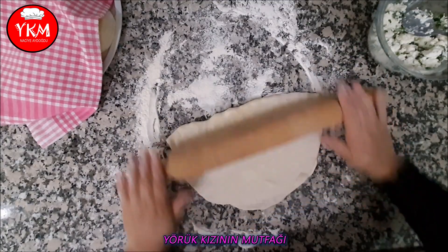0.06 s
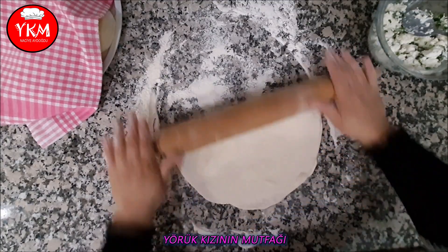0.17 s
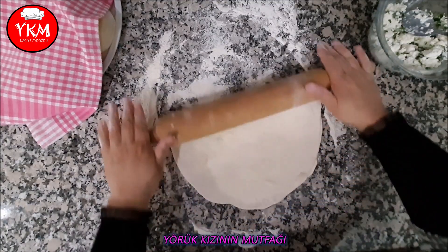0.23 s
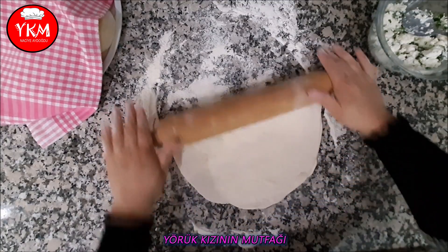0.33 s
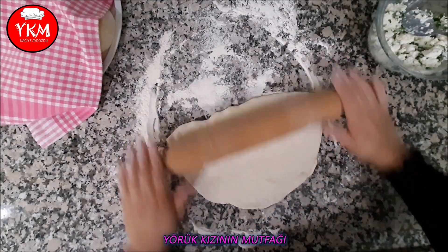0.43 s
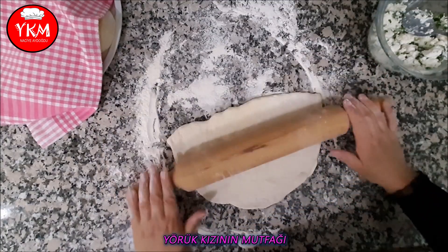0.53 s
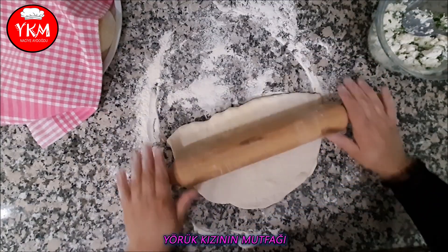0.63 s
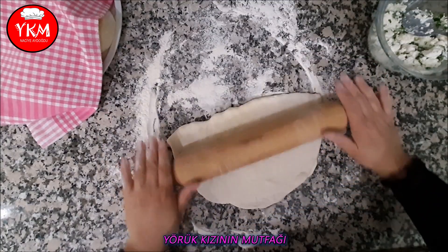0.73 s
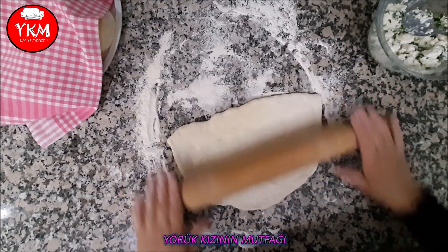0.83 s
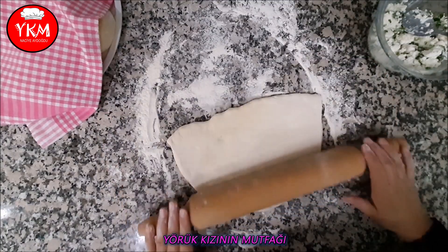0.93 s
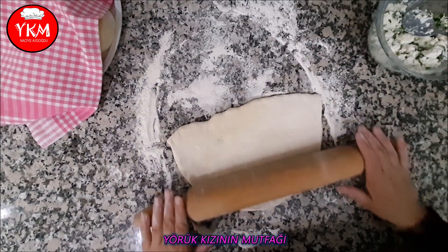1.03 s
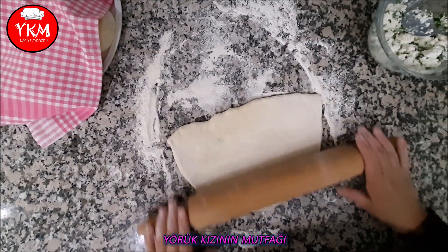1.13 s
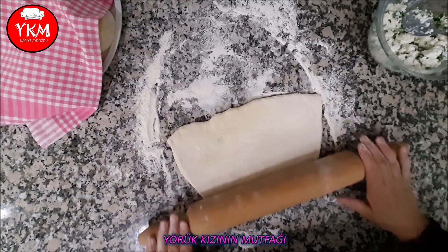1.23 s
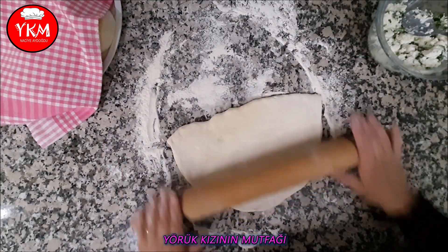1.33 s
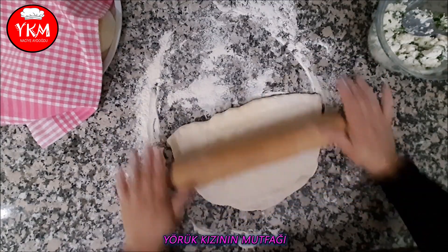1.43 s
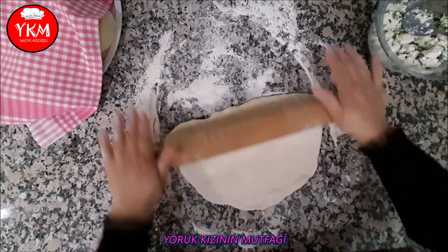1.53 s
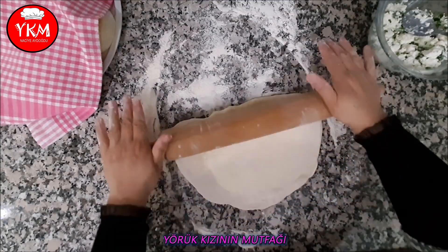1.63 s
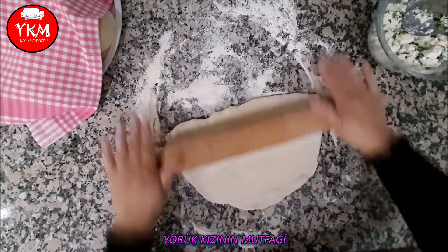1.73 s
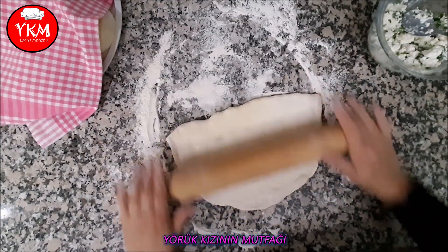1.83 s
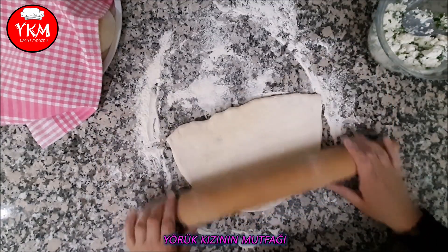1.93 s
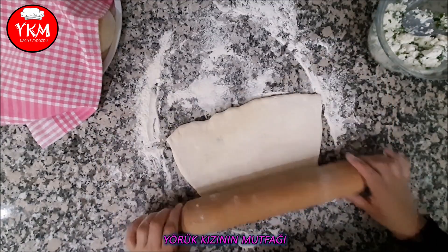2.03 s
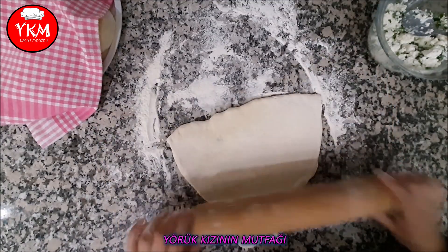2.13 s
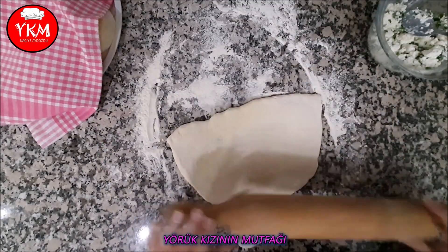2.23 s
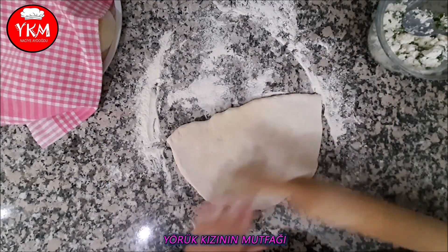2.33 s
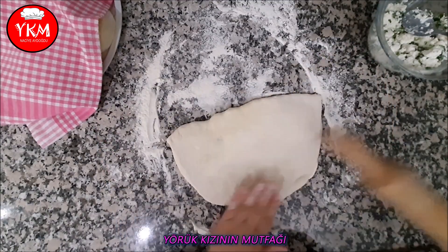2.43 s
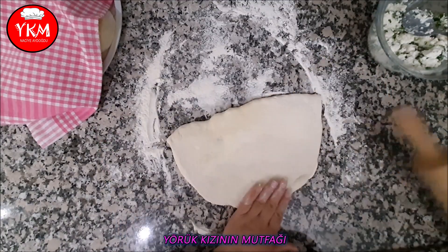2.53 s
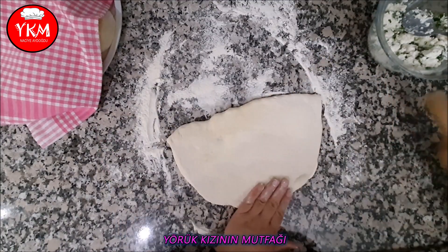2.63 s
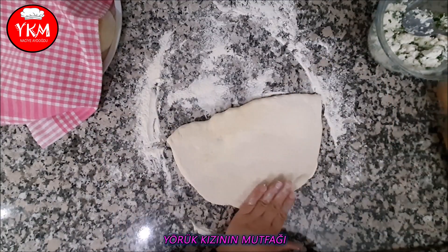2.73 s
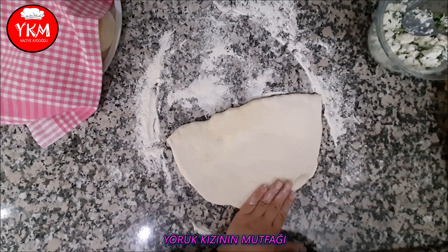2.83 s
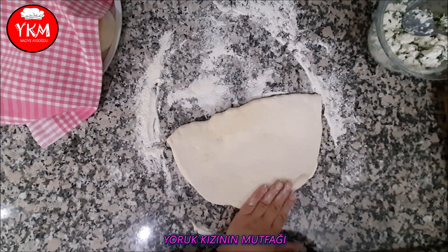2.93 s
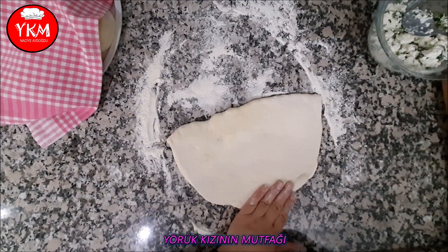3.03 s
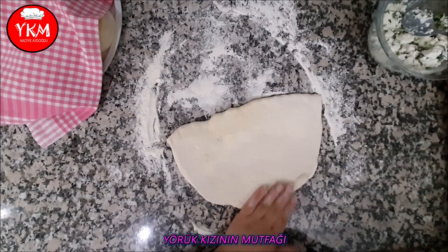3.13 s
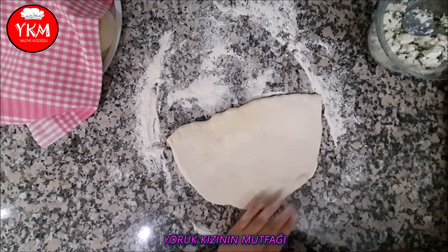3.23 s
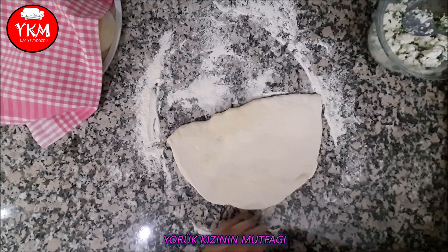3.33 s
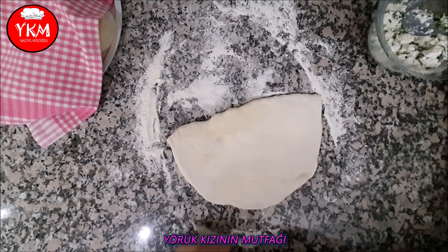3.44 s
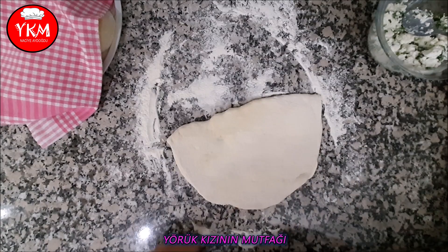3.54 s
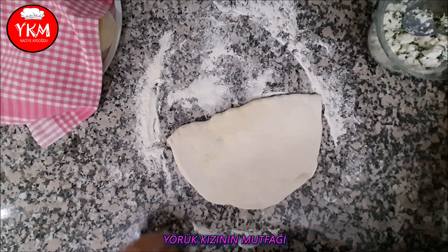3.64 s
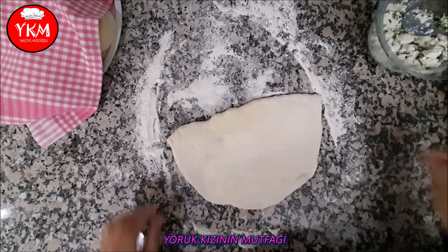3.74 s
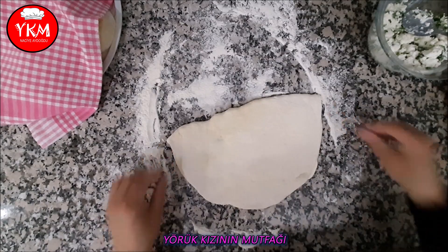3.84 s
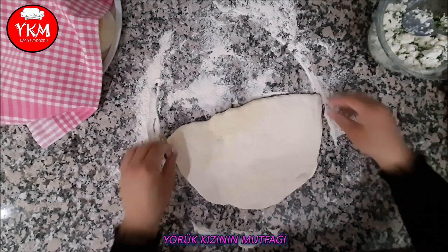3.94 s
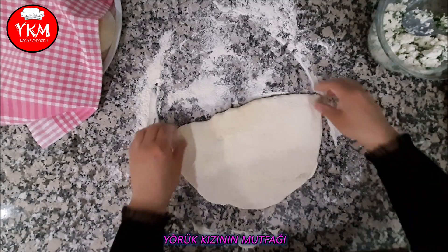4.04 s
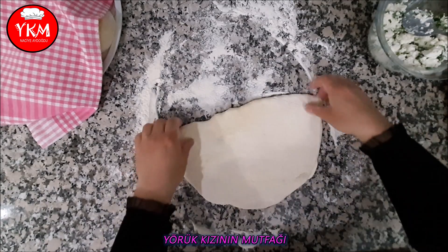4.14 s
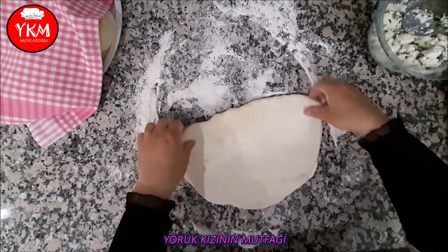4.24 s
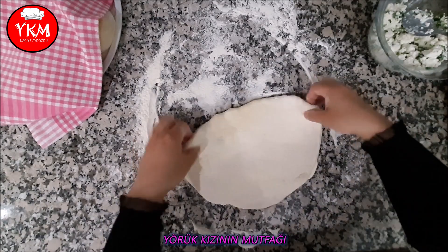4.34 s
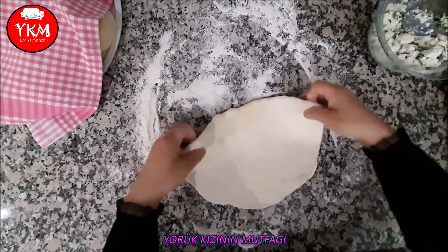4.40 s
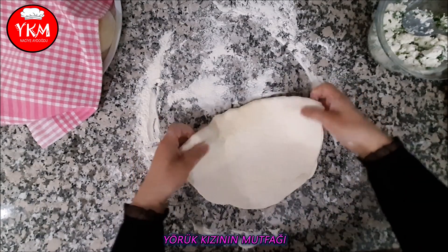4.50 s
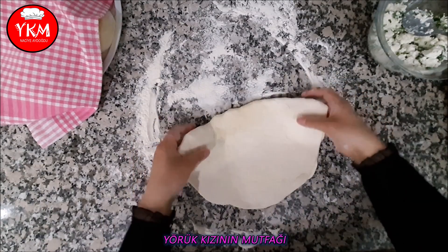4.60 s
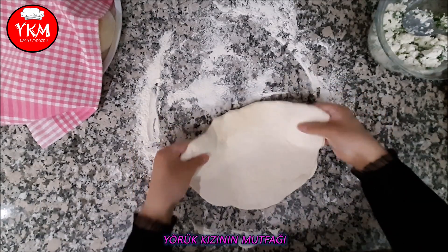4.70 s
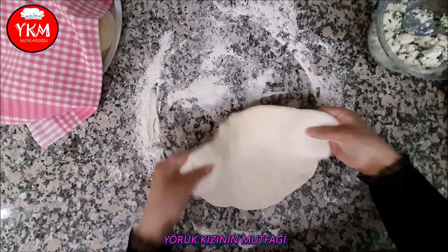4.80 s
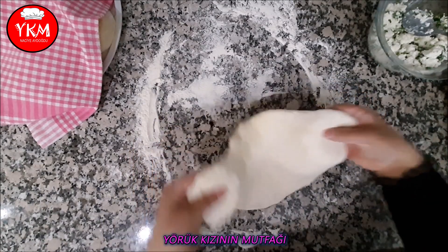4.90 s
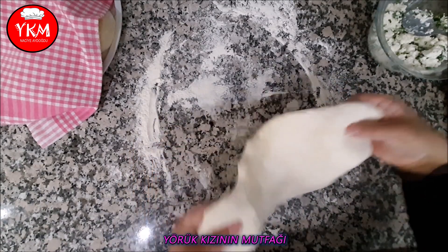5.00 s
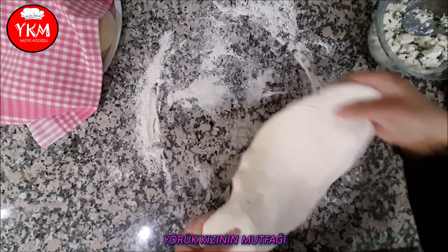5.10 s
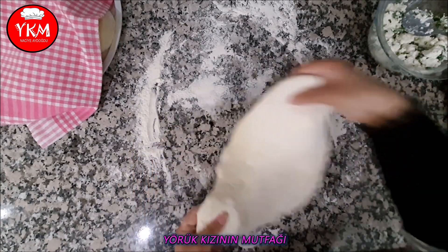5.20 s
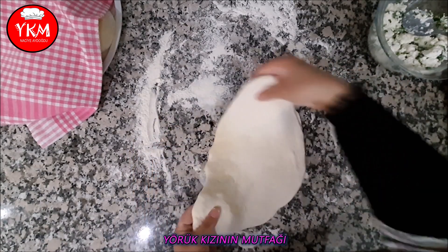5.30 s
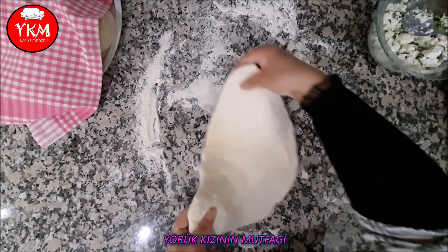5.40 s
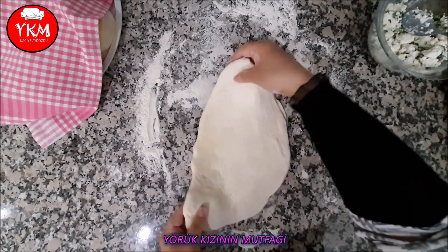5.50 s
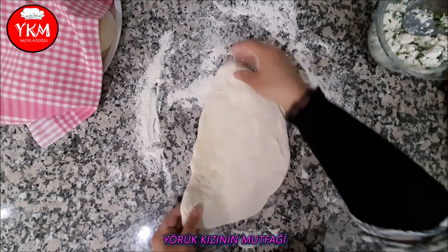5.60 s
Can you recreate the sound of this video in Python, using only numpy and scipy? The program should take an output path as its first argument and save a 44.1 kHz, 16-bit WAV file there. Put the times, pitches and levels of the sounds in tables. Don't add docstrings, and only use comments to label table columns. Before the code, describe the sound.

Close stereo microphones above a stone counter catch quick back-and-forth rubs of a rolling pin and palms over flour, grainy and airy with a hollow wooden tone. The pin then lands with two clear knocks, and a brush of flour ends in a muffled thud. Sparse light brushing follows, with a tiny creak, before dough flops softly onto the counter. A fridge hums quietly throughout in a small reflective room.

```python
import sys
import numpy as np
from scipy import signal
from scipy.io import wavfile
from scipy.ndimage import uniform_filter1d

SR = 44100
rng = np.random.default_rng(int(sys.argv[2]) if len(sys.argv) > 2 else 0)


def boost_factor(decibels):
    exponent = np.asarray(decibels, float) / 20
    return 10 ** exponent


def int16_out(signal):
    q = np.round(np.clip(np.atleast_2d(signal).T, -1, 1) * 32767)
    wavfile.write(sys.argv[1], SR, q.astype(np.int16))


N = 249585

# frequency [Hz], level [dB per Hz].
FINE_COLOUR = [(4410, -34), (7500, -17), (7950, -2.5), (8870, -4), (11800, 7.5), (15000, 5), (15600, 4.5)]
COARSE_COLOUR = [(1290, -27), (2200, -6), (2810, -5.5), (3550, -7.5), (4470, -2.5), (7480, -6),
                 (9500, -25.5), (12400, -32), (20900, -120)]
DRAG_COLOUR = [(500, 1), (750, -1), (1100, -6.5), (1500, -0.9), (2000, -6.5), (3200, -11), (6000, -21.5),
               (9000, -41)]
RUMBLE_COLOUR = [(40, -35.5), (60, 4.5), (105, -0.5), (140, 13), (185, -4.5), (230, -9), (400, -30.5),
                 (600, -31)]
# fastest moment [s], speeding up [s], slowing down [s],
# fine hiss [dB], coarser hiss relative to the fine [dB].
STROKES = [(.16, 0.083, 0.34, -80.5, 0.5), (0.548, 0.11, 0.19, -81, 1), (.675, 0.065, 0.029, -78, -3),
           (.84, 0.13, 0.16, -90, 6), (.97, 0.14, .06, -85.5, -3), (1.05, 0.087, 0.12, -69, -2.5),
           (1.26, 0.074, 0.12, -89.5, 1), (1.43, .08, .06, -89, 3), (1.54, 0.13, 0.23, -77.5, 0.8),
           (1.92, 0.092, 0.12, -75.5, 1.8), (2.04, 0.087, .12, -68.5, 1.2), (2.12, .06, 0.022, -72, .6),
           (2.25, 0.059, 0.11, -77.5, -2.5), (2.875, 0.028, 0.068, -84, -6), (3.176, .12, 0.14, -66, -2.5),
           (3.3, 0.068, 0.16, -90, -13), (3.47, 0.18, 0.091, -78.5, -4)]
# fastest moment [s], speeding up [s], slowing down [s],
# fine hiss [dB], coarser hiss relative to the fine [dB].
BRUSHES = [(4.3, 0.078, 0.17, -90, -4), (4.545, .05, 0.14, -87, -6.5), (4.635, .02, 0.053, -92.5, 8),
           (4.745, 0.085, 0.16, -84, 0), (4.995, .09, 0.14, -84, -6), (5.335, 0.024, 0.17, -80.5, 5),
           (5.5, 0.18, 0.18, -91.5, 12), (5.625, 0.13, 0.041, -73.5, 1.1)]
# fastest moment [s], speeding up [s], slowing down [s], level [dB].
DRAGS = [(.15, .2, 0.34, -85), (.585, .04, 0.2, -77), (.82, 0.044, 0.2, -67), (1.07, .12, 0.35, -83),
         (1.57, 0.17, 0.12, -80), (2.035, .05, .06, -77), (2.1, .025, 0.08, -68), (2.2, 0.087, .4, -82.5),
         (3.3, 0.027, .09, -69.5), (3.435, 0.017, .2, -72), (3.94, 0.13, 0.27, -85),
         (4.77, 0.14, 0.09, -79.5), (5.325, 0.038, 0.19, -70), (5.55, 0.23, 0.15, -71)]
# heaviest moment [s], building [s], easing [s], rumble [dB].
PRESSES = [(.15, 0.26, 0.78, -65), (.72, 0.19, 0.095, -63.5), (.88, 0.041, 0.1, -68),
           (1.09, 0.13, 0.072, -57.5), (1.28, 0.055, .15, -75), (1.65, 0.16, 0.26, -55.5),
           (2.0, 0.25, 0.36, -62), (2.5, 0.46, 0.096, -69), (2.84, .1, 0.044, -64.5),
           (3.4, 0.14, 0.47, -62.5), (4.72, 0.49, 0.28, -66.5), (5.31, .04, 0.087, -65),
           (5.47, 0.12, 0.52, -58)]


def rubbing():
    fine_rows, coarse_rows = [], []
    for s, up, down, db, more_db in STROKES + BRUSHES:
        fine_rows.append((s, up, down, db))
        coarse_rows.append((s, up, down, db + more_db))
    fine = movements(fine_rows, rest_db=-95.5)
    fine = fine * noise(shaped(FINE_COLOUR), size=256, patchy_db=1.1, lag=6.0) * grit(1.1, 4.0)
    coarse = movements(coarse_rows, rest_db=-96.0)
    coarse = coarse * noise(shaped(COARSE_COLOUR), size=256, patchy_db=2.3, lag=5.74) * grit(0.91, 1.7)
    drag = movements(DRAGS, rest_db=-88.5)
    drag = drag * noise(shaped(DRAG_COLOUR), size=512, patchy_db=1.2, lag=6.0) * grit(1.2, 4.0)
    lumps = grit(3.5, 79)
    rumble = noise(shaped(RUMBLE_COLOUR), size=2048, patchy_db=1.5)
    rumble = movements(PRESSES, rest_db=-71) * lumps * rumble
    return fine + coarse + drag + rumble


# frequency [Hz], width [Hz], level [dB].
PIN_RUB_MODES = [(1290, 68, 11), (1900, 46, 2), (1986, 18, 5), (2770, 42, -1.5), (2960, 24, -13),
                 (4470, 98, -15), (6200, 260, -22), (7500, 355, -20.5)]
# middle [s], length [s], level [dB],
# frequency of the modes the grip leaves freest [Hz].
SLIDES = [(.2, 0.32, -90, 4500), (0.625, 0.2, -81.5, 2460), (0.663, 0.046, -74, 7500),
          (1.082, 0.058, -69, 1660), (1.062, 0.11, -74.5, 5460), (1.545, 0.11, -101, 3500),
          (1.924, 0.08, -82, 4500), (2.062, 0.082, -65.5, 1900), (2.118, 0.063, -82, 3500),
          (2.25, 0.064, -80.5, 7000), (2.267, 0.066, -79, 2770), (3.243, 0.22, -75, 2820),
          (3.497, 0.13, -76.5, 3360), (3.472, 0.14, -85, 5100)]


def sliding():
    t, out = np.arange(N) / SR, np.zeros((2, N))
    stick_slip = grit(0.47, 9.6)
    friction = noise(np.zeros_like, size=512, patchy_db=1.0, lag=6.2) * stick_slip
    rolling = boost_factor(-13.5) * movements([row[:4] for row in STROKES], rest_db=-110)
    for hz, width, db in PIN_RUB_MODES:
        level = boost_factor(db) * rolling
        tilt_db = 13 * np.log2(hz / 2760)
        for s, length, level_db, free_hz in SLIDES:
            swell = np.cos(np.pi * np.clip((t - s) / (2.3 * length), -0.5, 0.5)) ** 2
            grip_db = -17 * np.log2(hz / free_hz) ** 2
            level = level + boost_factor(db + level_db + tilt_db + grip_db) * swell
        out += level * resonate(friction, hz, 1.4 * width)
    return out


# start [s], blow [dB], softness [dB lost each half octave well above 420 Hz],
# counter ring [dB], top modes of the pin [dB], time until a hand stills the counter [s].
KNOCKS = [
    (2.8655, -24.5, 0.36, 4.5, 4, .19),
    (3.0641, -24.5, 0.75, 6, -3, .19),
    (3.4226, -43, 9.5, 5.5, 0, .155),
    (3.4457, -57, 12.5, 3.5, -5, .13),
    (3.46, -49.5, 11.5, 3, -8, .115),
]
# frequency [Hz], level [dB].
BLOW_COLOUR = [(30, -32.5), (55, -11.5), (200, -6.5), (400, -4), (800, -5.5), (1250, -8), (1650, -20),
               (2050, -22.5), (2350, -31), (2800, -22), (3150, -34.5), (3500, -47.5), (5000, -51.5),
               (16000, -102.5)]
# frequency [Hz], level [dB], t60 [s].
PIN_MODES = [(529, 4, 0.03), (770, -0.5, 0.044), (870, 3.5, 0.054), (1120, -1, 0.035), (1220, -10, 0.03),
             (1560, 14, 0.017), (1867, 5.5, 0.059), (1940, -4, 0.011), (2730, -6, 0.019), (2930, 3, 0.059)]
# frequency [Hz], level [dB], t60 [s].
COUNTER_MODES = [(62.6, -1.5, 0.2), (107.5, -4.5, 0.48), (152.3, -7.5, 0.37), (163, 4, 0.11),
                 (260.8, -6.5, 0.3), (289, -17, 0.12), (346.4, 1, 0.13), (404, -8.5, .2), (482.3, -7, 0.22)]


def knock(db, soft_db, bass_db, top_db, stilled):
    hz, t = abs(np.fft.fftfreq(8192, 1 / SR)), np.arange(SR // 2) / SR
    dulling_db = soft_db * np.log2(1 + (hz / 420) ** 2)
    colour = np.log(boost_factor(read(BLOW_COLOUR, hz) - dulling_db))
    pulse = -np.fft.ifft(np.exp(np.conj(signal.hilbert(colour)))).real[:4096]
    pin, counter = np.zeros(len(t)), np.zeros(len(t))
    for f, d, t60 in PIN_MODES:
        pin += boost_factor(d + top_db * (f > 2400) - 60 * t / t60) * np.cos(2 * np.pi * f * t)
    for f, d, t60 in COUNTER_MODES:
        counter += boost_factor(d + bass_db - 60 * t / t60) * np.cos(2 * np.pi * f * t)
    counter *= boost_factor(-400 * np.maximum(t - stilled, 0))
    counter *= 1 - np.exp(-t / 0.0087)
    click = t == 0
    rings = np.array([boost_factor(-43.5) * pin + click, boost_factor(-40.5) * counter])
    return boost_factor(db) * signal.fftconvolve(rings, pulse[None] / abs(pulse).max(), axes=1)


# start [s], level [dB], length [s].
SLAPS = [
    (5.316, -51.5, 0.0089),
    (5.325, -54.5, 0.007),
]
# frequency [Hz], level [dB per Hz].
SLAP_COLOUR = [(250, -21), (400, -2), (750, -13), (1050, -1), (1450, -3), (1900, -15), (4500, -18),
               (8400, -39), (12000, -29), (16000, -32)]


def slaps():
    t, level = np.arange(N) / SR, np.zeros(N)
    for s, db, length in SLAPS:
        u = np.maximum(t - s, 0)
        attack = np.minimum(u / 0.00078, 1)
        level += boost_factor(db) * attack * (np.exp(-u / length) + 0.18 * np.exp(-u / 0.044))
    return level * noise(shaped(SLAP_COLOUR), size=256, patchy_db=1.5, lag=4.0)


# start [s], level [dB], frequency [Hz], t60 [s].
TICKS = [
    (2.106, -59, 3850, .04),
    (2.116, -60, 3650, .04),
    (.597, -68, 2400, .015),
]


def ticks():
    t, out = np.arange(2000) / SR, np.zeros((2, N))
    side_phase = np.array([[0], [1.2]])
    for s, db, hz, t60 in TICKS:
        add(out, s, boost_factor(db - 60 * t / t60) * np.sin(2 * np.pi * hz * t + side_phase))
    return out


# time [s], pitch [Hz], level [dB].
CREAK = [
    (3.755, 505, -90),
    (3.78, 485, -69),
    (3.81, 455, -66),
    (3.83, 435, -76),
    (3.86, 420, -92),
]


def creak():
    pitch = curve(CREAK, 1, off=410) * grit(0.16, 6.7)
    turns = np.cumsum(pitch) / SR
    return boost_factor(curve(CREAK, 2)) * np.sin(2 * np.pi * turns)


# delay [ms], left level [dB], right level [dB].
EARLY = [(1.26, -17.5, 4.5), (2.06, 6, -2), (4, 6.5, 5.5), (5.57, 9, -18), (6.9, 5, -10), (9.06, 3.5, -4.5),
         (12.2, -18.5, -5.5), (13.18, -9.5, 2), (16.34, -14, -41), (22.5, -20, -26), (30.35, -10, -20),
         (38.7, -5, -13), (47.9, -10, -2.5)]
# frequency [Hz], t60 [s].
ROOM_DECAY = [(100, 0.7), (260, 0.34), (500, 0.45), (900, 0.44), (1840, 0.44), (2800, 0.42), (4850, 0.52),
              (12000, 0.25)]
# frequency [Hz], left-right likeness [0-1].
SAME = [(60, 1), (130, 0.95), (290, 0.66), (640, 0.57), (1400, 0.068), (3000, 0.078), (15000, .03)]


def kitchen(x, wet_db, early_db):
    lag = 16
    taps = np.zeros((2, SR))
    at = np.arange(200, SR - 20, 20) + rng.integers(0, 20, (2, (SR - 201) // 20))
    np.put_along_axis(taps, at, rng.choice([-1., 1.], at.shape), 1)
    hz, t, (left, other) = signal.stft(taps, SR, nperseg=1024)
    hz = hz[:, None]
    same = np.clip(read(SAME, hz), 0, 1)
    right = same * left + np.sqrt(1 - same ** 2) * other
    pair = np.array([left, right]) * boost_factor(-60 * t / read(ROOM_DECAY, hz))
    tail = signal.istft(pair, SR, nperseg=1024)[1]
    tail *= np.clip((np.arange(tail.shape[1]) - 200) / 500, 0, 1)
    tail *= boost_factor(wet_db) / np.linalg.norm(tail[0])
    tail[0, lag] += boost_factor(5.0)
    tail[1, 0] += boost_factor(4.0)
    for k, (ms, left_db, right_db) in enumerate(EARLY):
        i = round(ms * SR / 1000)
        sign = (-1) ** (k // 2)
        left_lag = lag if k % 2 == 0 else 0
        tail[0, i + left_lag] += sign * boost_factor(left_db + early_db)
        tail[1, i + lag // 2] += sign * boost_factor(right_db + early_db)
    return signal.fftconvolve(x[None], tail, axes=1)[:, :N]


# frequency [Hz], width [Hz], level [dB].
FAN = [(338, 20, -82.5), (930, 10, -97.5), (1495, 66, -84), (2078, 100, -87.5)]
# frequency [Hz], level [dB], left lag [rad],
# left over right [dB].
HUM = [
    (98.8, -62.5, 0.1, 1.5),
    (592.3, -67, 0.27, 2.1),
    (935, -82.5, 2.3, 6.5),
]


def fridge():
    t, side = np.arange(N) / SR, np.array([[1], [-1]]) / 2
    draught = noise(np.zeros_like, size=2048, patchy_db=-4.5)
    out = np.zeros((2, N))
    for hz, width, db in FAN:
        out += boost_factor(db) * resonate(draught, hz, width)
    for hz, db, lag, lean_db in HUM:
        tone = np.sin(2 * np.pi * (hz * t + rng.random()) - lag * side)
        out += np.sqrt(2) * boost_factor(db + lean_db * side) * tone * grit(0.2, 300.0)
    return out


# frequency [Hz], level [dB per Hz].
AIR_COLOUR = [(25, -30), (42, -9.5), (60, 0), (140, -3.5), (200, -14), (450, -13.5), (900, -18),
              (1600, -26), (2300, -43), (3000, -48), (6000, -48.5), (9000, -65), (12500, -44.5),
              (16000, -38)]


def still_air():
    return boost_factor(-65) * noise(shaped(AIR_COLOUR), size=2048, patchy_db=-0.1, lag=12.4)


def movements(rows, rest_db):
    t, level = np.arange(N) / SR, boost_factor(rest_db)
    for s, up, down, db in rows:
        away = np.where(t < s, (s - t) / up, (t - s) / down)
        level = level + boost_factor(db - 23 * away ** 1.41)
    return level


def grit(depth_db, ms):
    wander = uniform_filter1d(rng.standard_normal(N), max(int(ms * SR / 1000), 1))
    return evened(boost_factor(depth_db * evened(wander)))


# frequency [Hz], left over right [dB].
BALANCE = [(60, 2), (300, 3), (1200, 3), (2400, 4), (5000, 1.3), (9000, 0.5), (15000, 0)]


def noise(db_at, size, patchy_db, lag=0.0):
    hop, hz = size // 4, np.fft.rfftfreq(size, 1 / SR)
    a, b, c, d, patches = rng.standard_normal((N // hop + 5, len(hz), 5)).T
    patches = uniform_filter1d(patches, size=size // 64, axis=0)
    patches = evened(uniform_filter1d(patches, size=4096 // size * 3, axis=1))
    same = np.clip(read(SAME, hz), 0, 1)[:, None]
    left, other = a + 1j * b, c + 1j * d
    right = same * left + np.sqrt(1 - same ** 2) * other
    late = np.exp(-2j * np.pi * hz * lag / SR)[:, None]
    lean = boost_factor(read(BALANCE, hz) / 2)[:, None]
    z = np.array([left * late * lean, right / lean])
    z *= boost_factor(db_at(hz)[:, None] + patchy_db * patches)
    x = signal.istft(z, nperseg=size, noverlap=size - hop)[1][:, :N]
    return x / np.sqrt(np.mean(x.mean(0) ** 2))


def resonate(x, hz, width):
    pole = np.exp((-np.pi * width + 2j * np.pi * hz) / SR)
    once = signal.lfilter([1], [1, -pole], x)
    return evened(signal.lfilter([1], [1, -pole], once).real)


def evened(x):
    return x / np.sqrt(np.mean(x ** 2) + 1e-20)


def read(points, hz):
    f, value = np.transpose(points)
    return np.interp(np.log(hz + 1), np.log(f + 1), value)


def shaped(points):
    return lambda hz: np.where((hz < points[0][0]) | (hz > points[-1][0]), -90, read(points, hz))


def curve(rows, column, off=-120):
    rows = np.array(rows)
    return np.interp(np.arange(N) / SR, rows[:, 0], rows[:, column], off, off)


def add(mix, s, sound):
    part = mix[..., round(s * SR):][..., :sound.shape[-1]]
    part += sound[..., :part.shape[-1]]


def scene():
    blows = np.zeros((2, N))
    for s, *how in KNOCKS:
        add(blows, s, knock(*how))
    pin, stone = blows
    counter = stone * boost_factor([[1.2], [-1.2]])
    in_room = kitchen(pin + 0.19 * stone + creak(), wet_db=6.5, early_db=-0.5)
    return rubbing() + sliding() + in_room + counter + slaps() + ticks() + fridge() + still_air()


def band_limit(x):
    return signal.sosfilt(signal.butter(12, 15720, fs=SR, output="sos"), x)


def record(dry):
    roll_off = signal.butter(3, 42, "high", fs=SR, output="sos")
    mix = signal.sosfilt(roll_off, dry)
    return band_limit(mix)


dry = scene()
out = record(dry)
int16_out(out)
```